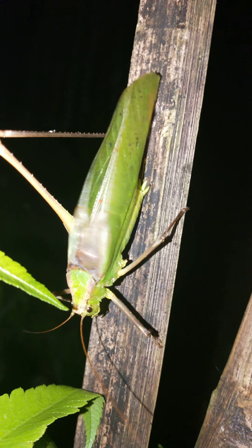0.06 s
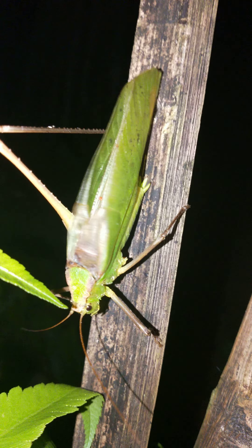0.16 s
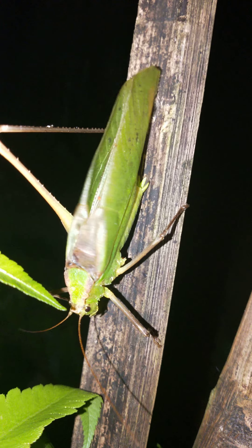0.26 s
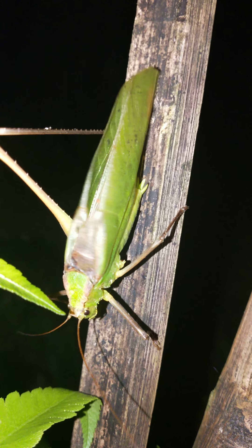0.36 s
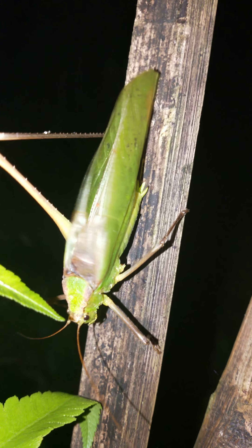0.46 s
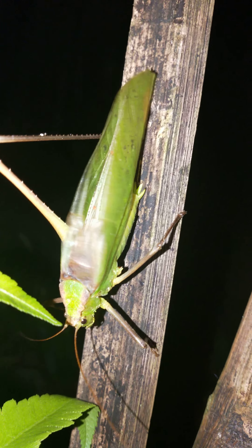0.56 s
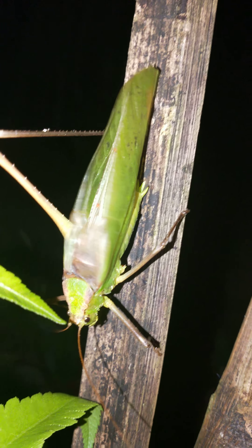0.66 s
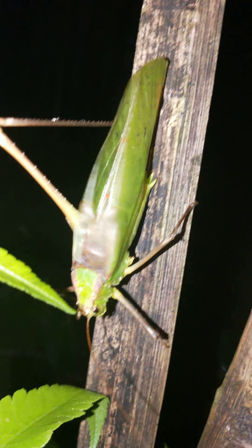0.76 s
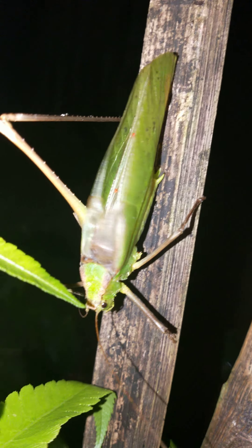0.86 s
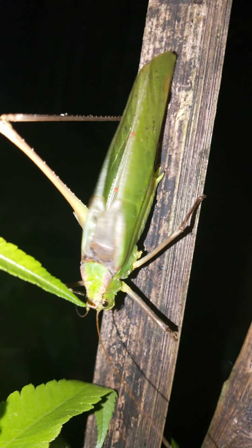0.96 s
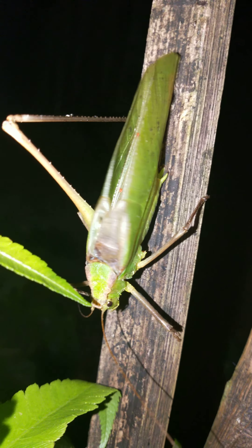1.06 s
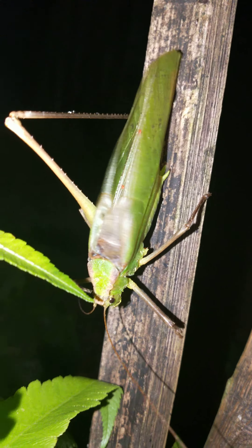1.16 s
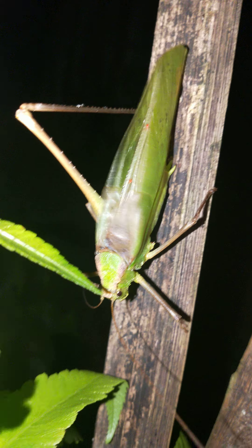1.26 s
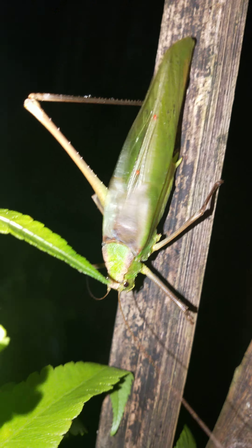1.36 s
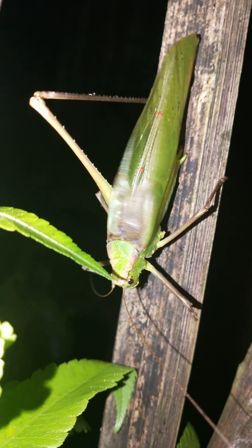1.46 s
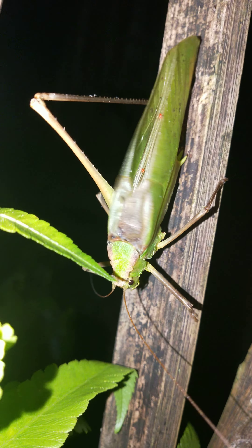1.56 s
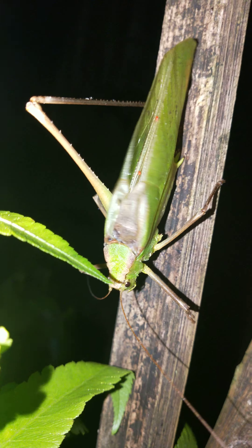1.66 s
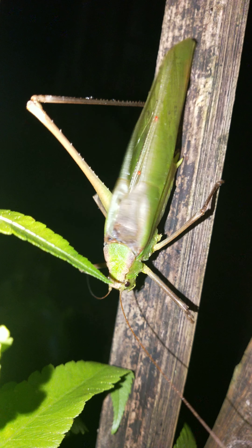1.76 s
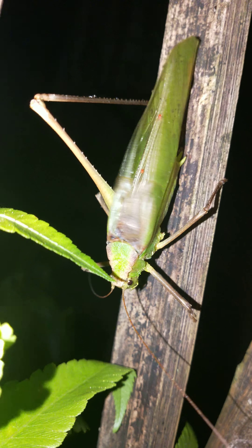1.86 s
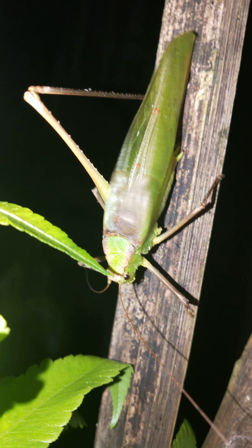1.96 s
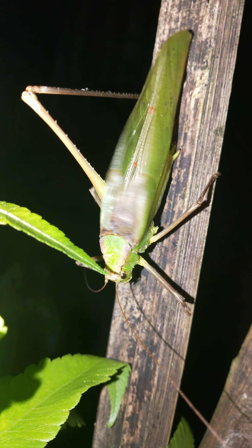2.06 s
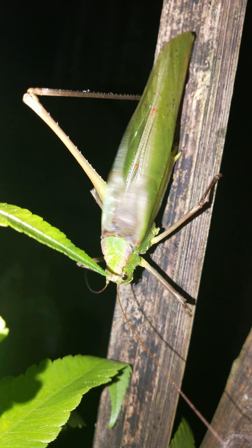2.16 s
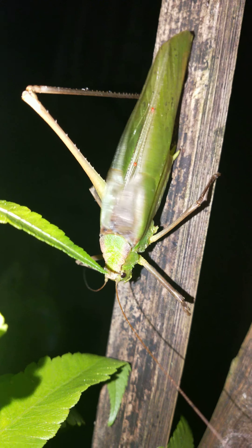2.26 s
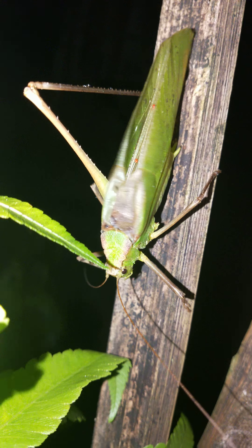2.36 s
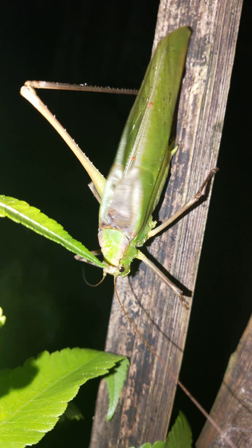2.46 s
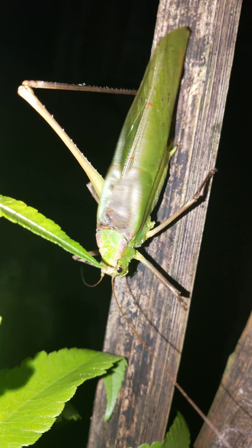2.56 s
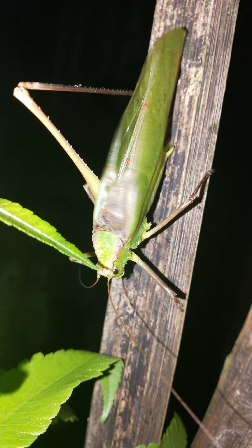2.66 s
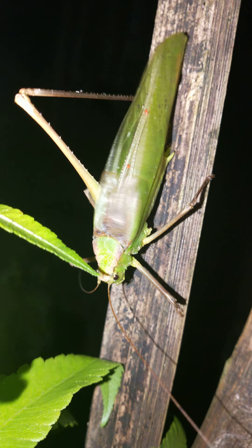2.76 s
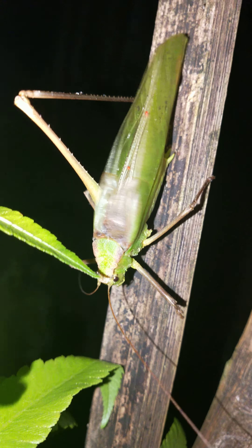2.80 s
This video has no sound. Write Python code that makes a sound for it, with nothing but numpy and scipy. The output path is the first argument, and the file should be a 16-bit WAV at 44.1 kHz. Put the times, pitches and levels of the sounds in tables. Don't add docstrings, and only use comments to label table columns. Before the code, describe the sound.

Dry, close and piercing, an insect's high buzz holds from beginning to end with only small swells. Fast wing strokes give it a coarse, machine-like flutter; each stroke mixes short ringing chirps, scratchy scraping, soft tooth rattles and steady fizz. The tiny microphone is held very near, so the right channel distorts with low gritty crackling while the left is quieter and cleaner. No clear gaps, no other creature.

```python
import sys
import numpy as np
from scipy import signal
from scipy.fft import rfft, irfft
from scipy.io import wavfile
from scipy.ndimage import uniform_filter1d

SR = 44100
rng = np.random.default_rng(int(sys.argv[2]) if len(sys.argv) > 2 else 0)


def file_out(sig):
    cols = np.atleast_2d(sig).T
    lim = np.clip(cols, -1, 1)
    pcm = np.round(lim * 32767).astype(np.int16)
    wavfile.write(sys.argv[1], SR, pcm)


def decibels_to_gain(level_db):
    exponent = np.asarray(level_db, float) / 20
    return 10 ** exponent


N = 335160

STROKES_PER_S = 28.72
# time in seconds, lead in strokes.
BEAT_DRIFT = [(0.0, -0.203), (0.5, -0.287), (0.8, -0.26), (1.2, -0.268), (1.6, -0.348), (2.0, -0.388),
              (2.2, -0.428), (2.4, -0.374), (2.7, -0.34), (3.3, -0.309), (3.9, -0.294), (4.4, -0.34),
              (4.8, -0.35), (5.6, -0.294), (6.15, -0.288), (6.4, -0.243), (7.2, -0.23), (7.6, -0.205)]
# pitch in Hz, left level in dB, right level in dB, likeness of the two ports (0-1).
FIZZ_COLOUR = [(199, -18, -28, 0), (1520, -34.5, -22, 0), (2558, -12, -13.5, 0.4),
               (3130, -30.5, -16.5, 0.9), (3965, -39, -28, 0.96), (4184, -24.5, -17.5, 0.7),
               (4810, -9, -7.5, 0.8), (5540, -8.5, -2, 0.5), (6020, -5, 0.5, 0.9), (6440, -2.5, -4.5, 0.3),
               (6920, -9.5, -7.5, 1), (8230, -54.5, -52.5, 0.6), (8320, -21.5, -26.5, 0.4),
               (10150, -31, -27, 0), (12650, -34.5, -29, 0.7), (13300, -27, -21, 0.4),
               (14100, -22.5, -19.5, 0.9)]
# place in strokes, length in strokes, change in dB.
PAUSES = [
    (.22, .025, -3),
    (.42, .04, -5),
    (.76, .03, -4),
]
FIZZ_DB = -4.5
# place in strokes, length in strokes,
# tooth rate in Hz, glide in Hz per length, left level in dB, right level in dB.
CHIRPS = [
    (.275, .023, 5450, -180, 9, 10.5),
    (.335, .018, 5550, 150, 7.5, 10.5),
    (.72, .014, 5500, 0, -3, 3),
    (.812, .019, 5700, 0, 4, 10),
    (.45, .015, 5500, 0, -10, -3),
    (.16, .025, 5600, 0, -5.5, -3),
]
SLACKEN_HZ_PER_S = 35
# place in strokes, length in strokes, centre in Hz, width in Hz,
# left level in dB, right level in dB.
SCRAPES = [(.585, .05, 5800, 900, -1.5, 6), (.66, .022, 6150, 500, -9, 2.5), (.97, .06, 5950, 600, -4, 4),
           (.965, .035, 6300, 600, -1, 8.5), (.92, .04, 5200, 700, -11, 0), (.2, .022, 6400, 600, -7, 0),
           (.34, .02, 6400, 600, -9, 0), (.09, .06, 4550, 800, -6, -6), (.35, .03, 11000, 5000, -17, -17),
           (.21, .025, 11000, 5000, -20, -17), (.03, .085, 14800, 1800, -12, -13),
           (.58, .08, 14900, 1800, -16, -21), (1.0, .05, 10500, 4400, -21, -13),
           (.65, .1, 4500, 800, -18, -11), (.58, .06, 6500, 700, -8, -3)]
# place in strokes, length in strokes,
# tooth rate in Hz, glide in Hz per length, left level in dB, right level in dB.
RASPS = [
    (1.02, .088, 2250, 120, -26, -28.5),
    (.62, .07, 2200, -40, -33.5, -38),
]
# pitch in Hz, left level in dB, right level in dB.
OVERTONES = [(1910, -8.5, -4.5), (2166, 3.5, 2.5), (2566, -11, 4), (2870, -14, -9), (4370, -35, 2),
             (5327, 20.5, -48.5), (6294, -33, 21), (6845, -26, 3), (6800, -72, -16.5), (8750, -54, -14),
             (12700, -21, -10.5), (12800, -36, -18), (13800, -30, -11), (15600, -29, -3)]
JUMPS = [
    (.915, .03, -.09, .035),
    (.985, .026, .07, .11),
    (1.05, .035, .04, .025),
    (.2, .03, .08, .015),
    (.295, .03, -.085, .04),
    (.29, .035, 0, .065),
    (.815, .022, 0, .05),
    (.12, .04, 0, .014),
    (.6, .2, 0, .006),
]
SNAPS = [
    (.98, .022, .016, .16, .12),
    (1.03, .016, .03, .03, .13),
    (.32, .028, .02, -.06, .16),
]
SNAP_DB = 2
# time in seconds, level in dB.
OVERDRIVE = [(0.0, -0.5), (0.9, -0.8), (2.3, -0.94), (3.5, .5), (4.1, 0.2), (5.2, 0.9), (6.3, 1.5),
             (7.0, 0.7), (7.6, -0.8)]
# time in seconds, effort in dB, left over right in dB,
# tilt toward the wing's flank in dB, turn of the left port in radians.
POSE = [(0.0, -17, -7, -2, 1), (0.45, -20, -20, 0.5, 1), (1.0, -15.5, -12.5, -2.5, 0.69),
        (1.5, -14, -12.5, -4.5, 0.13), (2.7, -14.5, -15, -4, 0.035), (3.2, -15.5, -12.5, -3, 0.3),
        (3.7, -17, -12.5, -4, -0.093), (4.4, -14.5, -13.5, -4.5, -0.53), (5.4, -13.5, -16, -4.5, -0.37),
        (6.5, -15.5, -13.5, -3, -0.7), (6.62, -13, -17.5, -4, -0.23), (6.9, -18, -19.5, -1.5, 0.77),
        (7.3, -17, -16.5, -0.5, 0.6), (7.6, -16, -13.5, -3.5, -0.081)]
FLUTTER_DB, SWAY_DB, FLUTTER_S = 1.0, 1.5, 0.029
# low edge in Hz, high edge in Hz, left level in dB, right level in dB,
# left change in dB per dB of tilt, right change in dB per dB of tilt.
FLANK = [
    (4560, 5190, 8.5, -1.5, 1.5, 0.84),
    (12900, 22000, 8, 2, 1.5, -0.3),
]
# pitch in Hz, lead of the left port in radians.
LEFT_LEADS = [(0, 0), (2410, 0.9), (4310, -0.2), (4650, -2.3), (5000, -2.4), (6890, -9.0), (8010, -9.7),
              (9470, -13.3), (10100, -15.7), (11600, -15.7), (12700, -22.6), (13200, -22.2), (14600, -24.9),
              (16400, -28.2)]
TURNED_HZ = [4500, 5900]
# time in seconds, notch centre in Hz, depth (0-1).
SHADOW = [(0.0, 13000, .4), (0.7, 13100, .5), (1.2, 13300, .95), (3.2, 13200, .95), (4.3, 13100, .9),
          (5.0, 13000, 1), (6.55, 13000, 1), (6.7, 12700, .4), (7.6, 12700, .3)]
SHADOW_WIDTH_HZ = 2600
BASS_CUT_HZ = [75, 31]
# pitch in Hz, half a rounding step over the nearby level in dB.
ROUNDING = [(1000, -24), (1700, -14), (2300, -8), (3000, -3), (3850, 3), (4400, -2), (5200, -11),
            (6400, -15), (7000, 0), (7600, 6.5), (8200, 5), (9000, 2.5), (10300, 4), (11500, 1.5),
            (13300, 1.5), (14300, -6), (15800, -4)]
MOOD_DB = 3.5


def evened(x):
    return x / np.sqrt(np.mean(x ** 2, axis=-1, keepdims=True) + 1e-20)


def cut(order, hz, kind="lowpass"):
    return signal.butter(order, hz, kind, fs=SR, output="sos")


def read(rows, hz):
    f, *columns = np.transpose(rows)
    return np.array([np.interp(np.log(hz + 1), np.log(f + 1), c) for c in columns])


def over_time(rows):
    s, *columns = np.transpose(rows)
    return [np.interp(np.arange(N) / SR, s, c) for c in columns]


def wander(width):
    once = uniform_filter1d(rng.standard_normal(N), int(width))
    return evened(uniform_filter1d(once, int(width)))


def ports(sound, left_db, right_db):
    return np.array([decibels_to_gain(left_db) * sound, decibels_to_gain(right_db) * sound])


def within(place, length, late, uneven_db):
    [lead] = over_time(BEAT_DRIFT)
    strokes = STROKES_PER_S * np.arange(N) / SR + lead - place
    whole = np.round(strokes)
    chances = rng.standard_normal((int(STROKES_PER_S * N / SR) + 8, 3))
    chance = chances[whole.astype(int) + 4].T
    u = (strokes - whole - late * chance[0]) / length
    force = np.exp(-u ** 2 / 2) * decibels_to_gain(uneven_db * chance[1])
    return u, force, chance[2]


def fizz():
    patches = rng.standard_normal((N // 64 + 5, 129))
    patches = uniform_filter1d(uniform_filter1d(patches, 6, 0), 4, 1)
    patches = evened(patches).T
    z = signal.stft(rng.standard_normal((2, N)), nperseg=256, noverlap=192)[2]
    z = z * decibels_to_gain(3.5 * patches[:, :z.shape[-1]])
    shared, own = rfft(signal.istft(z, nperseg=256, noverlap=192)[1][:, :N])
    left_db, right_db, same = read(FIZZ_COLOUR, np.fft.rfftfreq(N, 1 / SR))
    same = np.clip(same, 0, 1)
    left = same * shared + np.sqrt(1 - same ** 2) * own
    coloured = irfft(np.array([left, shared]) * decibels_to_gain([left_db, right_db]), N)
    sag_db = np.zeros(N)
    for place, length, db in PAUSES:
        sag_db += db * within(place, length, late=0.0046, uneven_db=2.0)[1]
    return decibels_to_gain(FIZZ_DB + sag_db) * coloured / np.sqrt(np.mean(coloured ** 2))


def chirps():
    out = np.zeros((2, N))
    sunk_hz = SLACKEN_HZ_PER_S * np.arange(N) / SR
    for k, (place, length, hz, glide_hz, left_db, right_db) in enumerate(CHIRPS):
        u, force, chance = within(place, length, late=0.008, uneven_db=1.6)
        pitch = hz * (1 + 0.008 * chance + 0.016 * wander(25)) + glide_hz * np.clip(u, -2, 2)
        if k == 0:
            pitch = pitch - sunk_hz
        tone = np.sqrt(2) * np.cos(2 * np.pi * np.cumsum(pitch) / SR)
        out += ports(force * tone * decibels_to_gain(wander(36)), left_db, right_db)
    return out


def scrapes():
    out = np.zeros((2, N))
    for place, length, hz, width_hz, left_db, right_db in SCRAPES:
        force = within(place, length, late=0.0041, uneven_db=0.0)[1]
        band = cut(3, [hz - width_hz / 2, hz + width_hz / 2], "bandpass")
        shared, own = evened(signal.sosfilt(band, rng.standard_normal((2, N))))
        out += ports(force * shared, left_db, right_db)
        out[0] += 0.4 * decibels_to_gain(left_db) * force * own
    return out


def rasps():
    out = np.zeros((2, N))
    for place, length, hz, glide_hz, left_db, right_db in RASPS:
        u, force, chance = within(place, length, late=0.01203, uneven_db=1.56)
        pitch = hz * (1 + 0.015 * chance + 0.022 * wander(40)) + glide_hz * np.clip(u, -2, 2)
        turns = np.cumsum(pitch) / SR
        for k in range(1, 8):
            left, right = read(OVERTONES, k * pitch)
            tone = np.sqrt(2) * np.cos(2 * np.pi * k * turns)
            unsteady = decibels_to_gain(1.8 * np.sqrt(k) * wander(21.8))
            out += ports(force * tone * unsteady, left_db + left, right_db + right)
    return out


def jumps():
    snaps = np.cumsum(rng.random(N) < 1100 / SR)
    values = rng.choice([-1., 1.], N + 1) * rng.uniform(0.6, 1.35, N + 1)
    held = signal.sosfilt(cut(1, 170, "highpass"), values[snaps]) * 1.055
    shift = np.zeros(N)
    for place, length, mean, spread in JUMPS:
        force = within(place, length, late=0.008, uneven_db=2.2)[1]
        shift += force * (decibels_to_gain(-1.5) * mean + decibels_to_gain(5.5) * spread * held)
    for place, length, late, mean, spread in SNAPS:
        u, _, chance = within(place, length, late, 0)
        creep = np.exp(-np.maximum(u, 0) * decibels_to_gain(3 * np.sin(9 * chance)))
        shift += decibels_to_gain(SNAP_DB) * (u > 0) * creep * (mean + spread * chance)
    [drive_db] = over_time(OVERDRIVE)
    return signal.sosfilt(cut(1, 3400), shift * decibels_to_gain(drive_db))


def shadowed(x):
    hz, depth = over_time(SHADOW)
    turn = np.exp(2j * np.pi * np.cumsum(hz) / SR)
    band = signal.sosfiltfilt(cut(1, SHADOW_WIDTH_HZ / 2), x / turn)
    return x - np.clip(depth, 0, 1) * 2 * (turn * band).real


def scene():
    effort_db, pan_db, tilt_db, turn = over_time(POSE)
    effort_db = effort_db + FLUTTER_DB * wander(FLUTTER_S * SR)
    pan_db = pan_db + SWAY_DB * wander(FLUTTER_S * SR)
    swell = decibels_to_gain([effort_db + (pan_db + 17.5) / 2, effort_db - (pan_db + 13.5) / 2])
    drag = decibels_to_gain(-9.0) * np.sqrt(swell)
    song = drag * (fizz() + decibels_to_gain(-7.5) * scrapes())
    song += swell * decibels_to_gain(-3.0) * chirps()
    song += decibels_to_gain(-0.98) * rasps()
    for low_hz, high_hz, left_db, right_db, left_share, right_share in FLANK:
        band = signal.sosfiltfilt(cut(4, [low_hz, high_hz], "bandpass"), song)
        lift = decibels_to_gain([left_db + left_share * tilt_db, right_db + right_share * tilt_db])
        song = song + band * (lift - 1)
    lead = np.interp(np.fft.rfftfreq(N, 1 / SR), *np.transpose(LEFT_LEADS))
    song[0] = irfft(rfft(song[0]) * np.exp(1j * lead), N)
    band = signal.sosfiltfilt(cut(2, TURNED_HZ, "bandpass"), song[0])
    song[0] += (signal.hilbert(band) * (np.exp(1j * turn) - 1)).real
    song[0] = shadowed(song[0])
    return song + decibels_to_gain([[-45], [0]]) * jumps()


def rounded(x):
    size, start = 1024, 500
    window = signal.windows.kaiser_bessel_derived(2 * size, 4 * np.pi)
    n, k = np.arange(2 * size)[:, None], np.arange(size)
    waves = np.cos(np.pi / size * (n + 0.5 + size / 2) * (k + 0.5))
    basis = window[:, None] * waves * np.sqrt(2 / size)
    count = N // size + 3
    padding = [(0, 0), (size - start, (count + 1) * size - N - size + start)]
    pair = np.pad([x[0] + x[1], x[0] - x[1]], padding) / 2
    halves = pair.reshape(2, count + 1, size)
    z = np.concatenate([halves[:, :-1], halves[:, 1:]], axis=2) @ basis
    near = uniform_filter1d(z ** 2, size=33, axis=2)
    near = abs(0.6 * near + 0.4 * near[::-1])
    band = (14 * np.log(k + 1)).astype(int)
    mood = rng.standard_normal((count, band[-1] + 1))
    mood = evened(uniform_filter1d(mood, size=6, axis=0))[:, band]
    step_db = read(ROUNDING, k * SR / 2 / size)[0] + MOOD_DB * mood
    step = 2 * np.sqrt(near + 1e-20) * decibels_to_gain(step_db)
    lapped = (np.round(z / step) * step * (k < 736)) @ basis.T
    out = np.zeros_like(halves)
    out[:, :-1] += lapped[..., :size]
    out[:, 1:] += lapped[..., size:]
    mid, side = out.reshape(2, -1)[:, size - start:][:, :N]
    return np.array([mid + side, mid - side])


def roll_off(x):
    return signal.sosfilt(signal.butter(12, 16810, fs=SR, output="sos"), x)


def record(dry):
    knee, squash = np.array([[0.28], [0.35]]), np.array([[0.36], [0.2]])
    over = np.maximum(dry - knee, 0)
    bent = dry - squash * signal.sosfiltfilt(cut(2, 8000), over)
    blocked = np.array([signal.sosfiltfilt(cut(2, hz, "highpass"), port)
                        for hz, port in zip(BASS_CUT_HZ, bent)])
    height = uniform_filter1d(abs(signal.hilbert(blocked)), 9) / 0.7
    limited = blocked / np.sqrt(np.sqrt(1 + height ** 4))
    treble_cut = signal.firwin(401, 15800, window=("kaiser", 9), fs=SR)
    edged = signal.oaconvolve(limited, treble_cut[None], "same")
    return roll_off(rounded(edged))


dry = scene()
out = record(dry)
file_out(out)
```